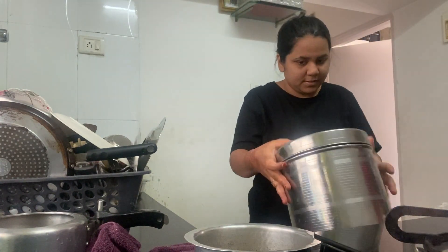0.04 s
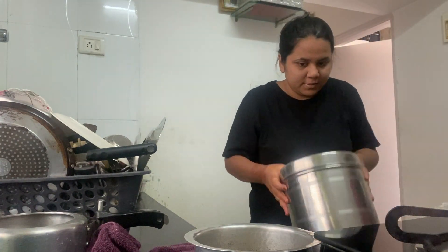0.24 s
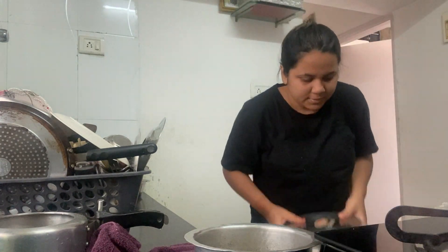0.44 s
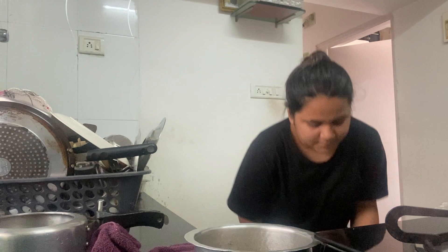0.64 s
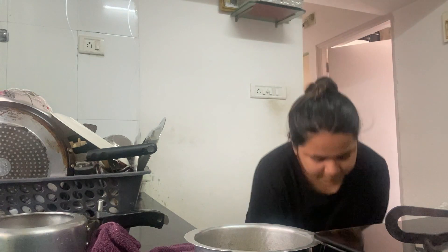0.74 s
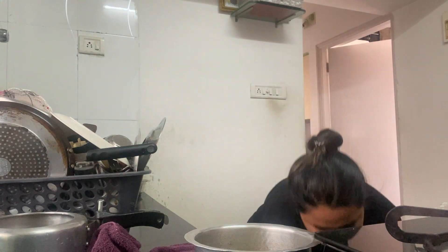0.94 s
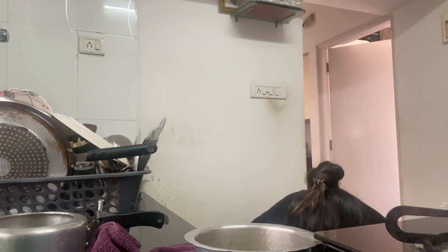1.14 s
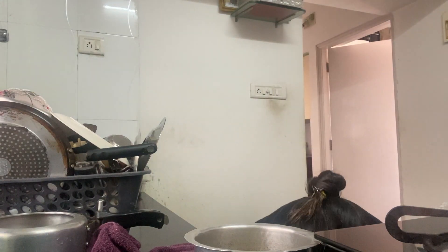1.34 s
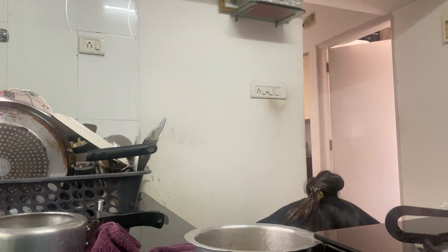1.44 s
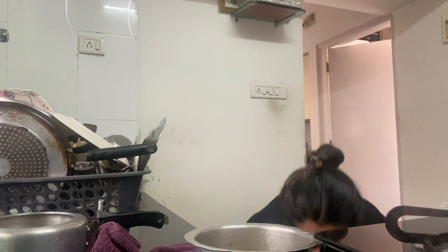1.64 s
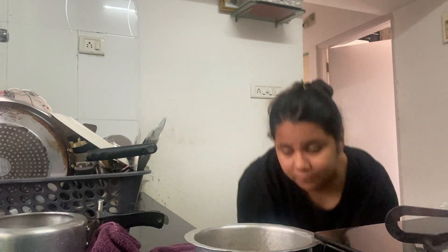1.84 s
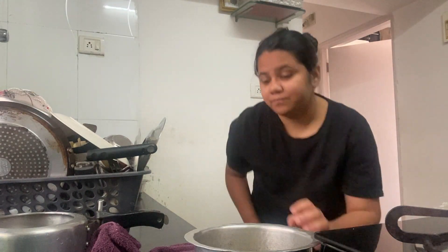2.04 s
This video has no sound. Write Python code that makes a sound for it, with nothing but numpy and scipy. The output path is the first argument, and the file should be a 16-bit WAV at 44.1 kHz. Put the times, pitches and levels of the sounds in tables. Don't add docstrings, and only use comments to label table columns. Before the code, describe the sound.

A large steel tin is handled in a small hard kitchen: light finger taps from 0 to 0.15 s, a hollow grip thump at 0.2, then a loud booming slam at 0.5 with dense clatter and a ringing rebound at 0.62. Rattles settle, with a small knock at 0.85 and a barely audible squeak at 1.1. Softer hollow bumps come at 1.3 and 1.63, over quiet low room hush.

```python
import sys
import numpy as np
from scipy import signal
from scipy.fft import rfft, irfft
from scipy.io import wavfile
from scipy.ndimage import uniform_filter1d

SR = 44100
rng = np.random.default_rng(int(sys.argv[2]) if len(sys.argv) > 2 else 0)


def dump(signal):
    limited = np.clip(np.atleast_2d(signal).T, -1, 1)
    pcm = np.round(limited * 32767).astype(np.int16)
    wavfile.write(sys.argv[1], SR, pcm)


def boost(x):
    u = np.asarray(x, float) / 20
    return 10 ** u


N = 92610

# (frequency [Hz], side minus mid [dB])
SIDE_WIDTH = [(60, -38.5), (130, -16.5), (270, -10.5), (450, 1), (700, 4), (1220, 0.5), (6000, -1),
              (15000, -3.5)]


def read(points, hz):
    f, value = np.transpose(points)
    return np.interp(np.log(hz + 1), np.log(f + 1), value)


def evened(x):
    return x / np.sqrt(np.mean(x ** 2) + 1e-20)


def shape(t, swell, hold, t60):
    rise = np.sin(np.pi / 2 * np.clip(t / max(swell, .001), 0, 1)) ** 2
    fall_s = np.maximum(t - swell - hold, 0)
    return rise * boost(-60 * fall_s / np.maximum(t60, .02))


def wander(t, step):
    knots = np.arange(int(N / SR / step) + 2) * step
    a, b = rng.standard_normal((2, len(knots)))
    return np.interp(t, knots, a + 1j * b)


def blow(start, modes, db=0):
    out = np.zeros((2, N))
    part = out[:, max(int(start * SR), 0):][:, :SR]
    t = np.arange(part.shape[1]) / SR
    for hz, mode_db, swell, hold, t60 in modes:
        depth, knot_s = (0.13, .025) if hz < 400 else (.5, .007)
        lag = np.arccos(-.35) + .3 * rng.standard_normal()
        mid = 1 + depth * wander(t, knot_s)
        side = np.exp(-1j * lag) * (1 + (depth + .2) * wander(t, knot_s))
        side = boost(read(SIDE_WIDTH, hz)) * side
        pair = (np.array([mid, side]) * np.exp(2j * np.pi * hz * t)).imag
        part += np.sqrt(2) * boost(db + mode_db) * shape(t, swell, hold, t60) * pair
    return out


def diffuse(power_of, size):
    # (frequency [Hz], share of the side locked to the mid [0-1])
    side_lock = [(3000, 0.05), (5500, .4), (7000, 0.88), (15000, 0.9)]
    in_step_hz, step_hz = 7950, 5150
    hop = size // 4
    frames = N // hop + 5
    hz = np.fft.rfftfreq(size, 1 / SR)[:, None]
    a, b, c, d, patches = rng.standard_normal((frames, len(hz), 5)).T
    patches = uniform_filter1d(patches, size=3, axis=0)
    patches = evened(uniform_filter1d(patches, size=15, axis=1))
    slip = np.clip(np.tan(np.pi * (hz - in_step_hz) / step_hz), -2, 2)
    lock = np.clip(read(side_lock, hz), 0, 1)
    mid = a + 1j * b
    locked = lock * slip * (b - 1j * a)
    free = np.sqrt(1 - lock ** 2) * (c + 1j * d)
    z = np.array([mid, boost(read(SIDE_WIDTH, hz)) * (locked + free)])
    z *= np.sqrt(power_of(np.arange(frames) * hop / SR, hz)) * boost(1.5 * patches)
    return signal.istft(z, nperseg=size, noverlap=size - hop)[1][:, :N] * np.sqrt(2 / size)


def hush():
    # (frequency [Hz], level [dB per Hz])
    air_colour = [(20, -50), (55, 0.5), (110, 2), (210, -5), (400, -13), (1200, -25), (4000, -33.5),
                  (15500, -51)]
    air = diffuse(lambda t, hz: boost(read(air_colour, hz) + 0 * t) ** 2, size=2048)
    return boost(-42.5) * air / np.std(air[0])


def finger_taps():
    # (frequency [Hz], level [dB], swell [s], hold [s], t60 [s])
    wall_modes = [(196.1, 3, 0.0086, 0.012, 0.22), (260.6, -0.5, 0.009, 0.011, 0.18),
                  (164.8, -2.5, 0.0063, 0.0087, 0.12)]
    # (time [s], level [dB])
    taps = [
        (0.0, -37.5),
        (.068, -30.5),
        (.09, -29),
        (.122, -31),
        (.335, -42.5),
        (1.13, -50.5),
        (1.584, -39),
        (1.8, -42.5),
    ]
    return sum(blow(s, wall_modes, db) for s, db in taps)


def clatter():
    # (time [s], level [dB], swell [s], hold [s], decay stretch [x])
    rustle_contacts = [
        (0.097, -51, .05, 0.05, 0.7),
        (0.013, -55.5, 0.0079, 0.078, 0.79),
        (0.391, -56, 0.034, 0.051, 0.69),
        (1.99, -54.5, .01, .02, 0.415),
        (1.628, -42.5, 0.0034, 0.029, 0.75),
        (.192, -49, 0.0078, 0.038, 0.36),
        (1.28, -54, 0.018, 0.021, 0.98),
        (0.82, -58, 0.016, 0.057, 0.91),
        (0.619, -29.5, 0.023, 0.029, 0.71),
        (0.494, -28, 0.024, 0.051, 0.9),
    ]
    dull_contacts = [
        (1.278, -30, 0.011, 0.042, 0.94),
        (1.628, -29, 0.014, 0.044, 0.66),
        (0.192, -33.5, 0.0034, 0.028, 0.69),
        (.484, -26, 0.0047, 0.074, 0.46),
        (0.05, -42, 0.023, 0.085, 0.86),
        (1.709, -41, 0.019, 0.062, 0.72),
    ]
    clank_contacts = [
        (1.281, -38.5, 0.012, 0.019, 0.56),
        (0.855, -46, .001, .01, 0.25),
        (0.71, -45, .003, .03, .4),
        (.193, -46.5, .003, 0.033, 0.53),
        (0.96, -52.5, 0.023, 0.064, 0.42),
        (1.22, -58.5, 0.029, 0.035, .5),
    ]
    bright_contacts = [
        (0.484, -28.5, 0.0066, 0.035, 1.4),
        (.515, -26.5, 0.015, 0.026, 0.8),
        (0.6163, -32, 0.0108, 0.013, 0.72),
        (.74, -43.5, 0.014, 0.016, 1.2),
        (.86, -49.5, 0.017, 0.069, 1.14),
        (1.82, -53, 0.077, 0.075, 0.71),
    ]
    # (frequency [Hz], level [dB per Hz])
    rustle_colour = [(300, -36), (1500, -2.5), (3000, -7), (6000, -5.5), (8200, 2.5), (9500, -5.5),
                     (12300, -8.5), (15000, -10.5)]
    dull_colour = [(35, -46), (70, -20), (130, 2.5), (270, 1.5), (600, -16), (1400, -24), (2400, -34.5),
                   (9000, -61)]
    clank_colour = [(400, 1), (800, 2), (2000, -8), (2800, -8.5), (3500, -18.5), (8000, -23), (15000, -48)]
    bright_colour = [(150, -16.5), (350, -1), (700, -8.5), (1900, -14), (4000, -10.5), (5500, -13),
                     (9500, -21.5), (15000, -30)]
    # (frequency [Hz], t60 [s])
    room_decay = [(100, 0.8), (500, 0.57), (2000, 0.58), (6000, 0.48), (14000, 0.45)]
    kinds = ((bright_contacts, bright_colour), (dull_contacts, dull_colour),
             (rustle_contacts, rustle_colour), (clank_contacts, clank_colour))

    def power(t, hz):
        total = 0
        for contacts, colour in kinds:
            tone = boost(read(colour, hz)) ** 2
            tone = tone / tone.sum()
            for s, db, swell, hold, stretch in contacts:
                level = boost(db) * shape(t - s, swell, hold, stretch * read(room_decay, hz))
                total = total + tone * level ** 2
        return total

    grain = boost(1.5 * evened(uniform_filter1d(rng.standard_normal(N), size=90)))
    return diffuse(power, size=512) * grain * 17.44


def steel(x):
    # (frequency [Hz], width [Hz], level [dB])
    pot_partials = [(1830, 150, -2.5), (2316, 54, 0), (2763, 42, -2.5), (3190, 440, -1.5), (3715, 110, -4),
                    (3920, 110, -2.5), (4170, 29, -3.5), (4560, 53, -3.5), (5064, 160, -1.5),
                    (5473, 36, -2), (6810, 170, -6), (7310, 62, -2), (8040, 76, -4.5), (8430, 61, -2.5)]
    t = np.arange(8000) / SR
    ring = 0
    for hz, width, db in pot_partials:
        ring = ring + boost(db) * np.sqrt(width) * np.sin(2 * np.pi * hz * t) * np.exp(-np.pi * width * t)
    ring = ring[None] / np.linalg.norm(ring)
    return x + boost(-7) * signal.fftconvolve(x, ring, axes=1)[:, :N]


def grip():
    # (frequency [Hz], level [dB], swell [s], hold [s], t60 [s])
    grip_modes = [(198.5, -23, 0.027, 0.031, 0.15), (262, -20.5, 0.019, 0.041, 0.1),
                  (150, -31.5, 0.0074, 0.0068, 0.34), (654, -40, 0.016, 0.026, 0.11),
                  (458, -50, 0.0077, 0.028, 0.15), (965, -49, 0.004, 0.023, 0.21),
                  (1580, -54.5, .02, 0.075, 0.42)]
    return blow(.192, grip_modes)


def single_swells():
    # (time [s], frequency [Hz], level [dB], swell [s], t60 [s])
    mode_swells = [(.62, 134, -28.5, .025, 0.18), (0.77, 120, -34.5, 0.022, .3), (.59, 190, -32, .03, 0.32),
                   (.57, 341, -31.5, 0.028, .2), (1.385, 266, -27.5, 0.019, .14),
                   (1.74, 275, -33.5, 0.012, 0.13), (1.6, 205, -42, 0.027, 0.19), (1.71, 415, -39, 0.017, .2),
                   (.32, 262, -37, 0.018, 0.12), (.215, 330, -34, 0.014, .12), (.703, 2312, -38, 0.017, 0.077),
                   (.715, 3990, -45, .008, .08), (.485, 430, -32.5, .012, .1), (.486, 150, -30, .01, .1),
                   (.79, 2320, -52, .01, .1), (.88, 2100, -55, 0.011, .1), (1.0, 2330, -59, 0.022, .12),
                   (1.015, 5700, -61, 0.014, 0.13), (.89, 5050, -61, 0.0073, .08),
                   (.97, 950, -53.5, .015, 0.17), (1.285, 1990, -45, 0.012, 0.11), (1.3, 1020, -56, 0.011, .1),
                   (1.2, 2750, -58, 0.025, 0.089), (1.675, 540, -38, .012, 0.071),
                   (1.635, 1450, -49, 0.019, 0.23)]
    return sum(blow(s, [(hz, db, swell, swell / 2, t60)]) for s, hz, db, swell, t60 in mode_swells)


def slam():
    # (frequency [Hz], level [dB], swell [s], hold [s], t60 [s])
    slam_modes = [(64.6, -14.5, 0.054, 0.11, 0.21), (130.8, -20, 0.063, 0.03, 0.18),
                  (187, -20, 0.024, 0.012, 0.25), (256.8, -27.5, 0.011, 0.054, 0.27),
                  (340.6, -24, 0.024, 0.042, 0.14), (534.3, -34, 0.045, 0.077, 0.33),
                  (1053, -36, 0.0049, 0.04, 0.43), (904, -53, 0.015, .04, 0.51),
                  (103.4, -27.5, 0.018, 0.09, 0.52)]
    return blow(.484, slam_modes)


def rebound():
    # (frequency [Hz], level [dB], swell [s], hold [s], t60 [s])
    rebound_modes = [(2320, -37.5, .025, 0.017, 0.14), (3940, -42.5, 0.023, 0.02, 0.2),
                     (3250, -44, 0.02, 0.023, 0.43), (535, -36.5, 0.0062, 0.015, 0.12),
                     (6900, -43, .035, .02, .1), (8430, -43, .015, .03, .15)]
    return blow(.625, rebound_modes)


def settle():
    # (frequency [Hz], level [dB], swell [s], hold [s], t60 [s])
    settle_modes = [(65.9, -34.5, 0.042, 0.046, 1), (131.1, -37.5, 0.015, 0.025, 0.8),
                    (986, -52.5, 0.017, 0.033, 0.94), (1545, -57, .02, 0.018, .58),
                    (2430, -52.5, 0.032, 0.028, 0.78), (3670, -56.5, 0.031, 0.023, 0.53),
                    (545, -45.5, 0.011, 0.067, 0.17)]
    return blow(.73, settle_modes)


def knock():
    # (frequency [Hz], level [dB], swell [s], hold [s], t60 [s])
    knock_modes = [(752, -44.5, .002, .008, 0.36), (558, -42, 0.0022, 0.008, 0.26),
                   (299, -46, 0.0041, 0.03, 0.36)]
    return blow(.851, knock_modes)


def squeak():
    # (frequency [Hz], level [dB], swell [s], hold [s], t60 [s])
    squeak_modes = [(1320, -60, .02, 0.057, .1), (2600, -64.5, 0.02, 0.03, .1)]
    return blow(1.1, squeak_modes)


def nudge():
    # (frequency [Hz], level [dB], swell [s], hold [s], t60 [s])
    nudge_modes = [(266.3, -16.5, 0.044, 0.012, 0.17), (132.2, -26, 0.022, 0.061, 0.15),
                   (334, -21.5, 0.022, 0.006, 0.1), (651, -38, 0.0073, 0.019, 0.19),
                   (192.4, -31, 0.014, 0.013, 0.66), (1133, -46, 0.011, 0.017, 0.16),
                   (100.8, -35.5, 0.042, 0.085, 0.51), (2540, -55, 0.02, 0.033, .15)]
    return blow(1.278, nudge_modes)


def shove():
    # (frequency [Hz], level [dB], swell [s], hold [s], t60 [s])
    shove_modes = [(261.6, -14, .035, 0.022, 0.2), (139.2, -26.5, 0.004, 0.035, 0.49),
                   (323.7, -28, 0.03, 0.011, 0.2), (71, -40, 0.12, 0.072, 0.61),
                   (475.7, -40.5, 0.013, 0.042, 0.21), (621, -42.5, 0.0048, 0.013, 0.22),
                   (667, -42, 0.0098, 0.022, 0.29)]
    return blow(1.628, shove_modes)


def scene():
    handling = finger_taps() + grip()
    landing = slam() + rebound() + settle() + knock()
    pushes = squeak() + nudge() + shove()
    mid, side = hush() + handling + steel(clatter()) + single_swells() + landing + pushes
    return np.array([mid + side, mid - side])


def without(x, gaps):
    z, hz = rfft(x), np.fft.rfftfreq(len(x), 1 / SR)
    for lo, hi in gaps:
        z = z * ((hz < lo) | (hz > hi))
    return irfft(z, len(x))


def roll_off(x):
    return signal.sosfilt(signal.butter(12, 15710, fs=SR, output="sos"), x)


def record(dry):
    # (low edge [Hz], high edge [Hz])
    mid_gaps = [(9850, 11100), (14750, 22100)]
    side_gaps = [(7620, 8300), (12430, 13770), (15750, 22100)]
    left, right = dry / (1 + (dry / .95) ** 8) ** .125
    mid = without((left + right) / 2, mid_gaps)
    side = without((left - right) / 2, side_gaps)
    return roll_off(np.array([mid + side, mid - side]))


dry = scene()
out = record(dry)
dump(out)
```